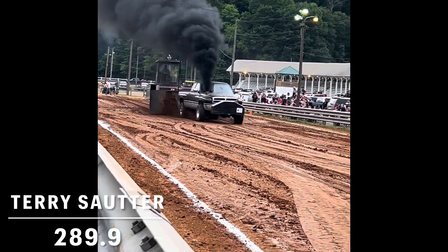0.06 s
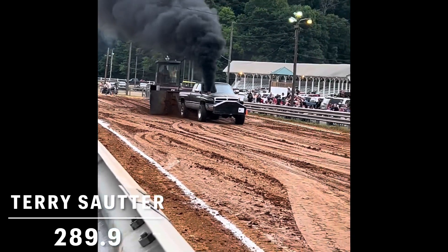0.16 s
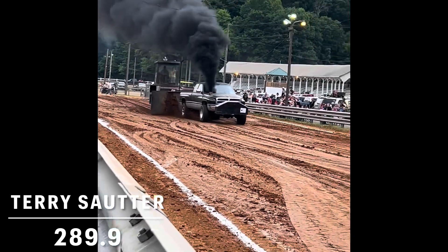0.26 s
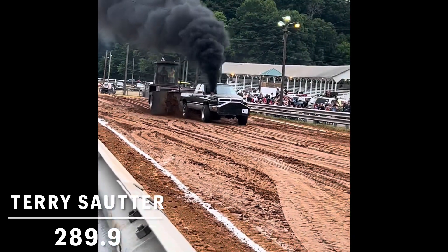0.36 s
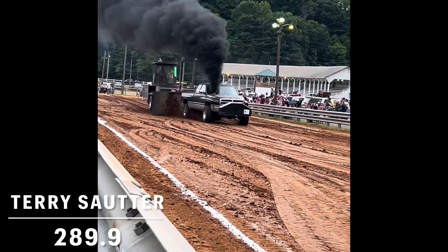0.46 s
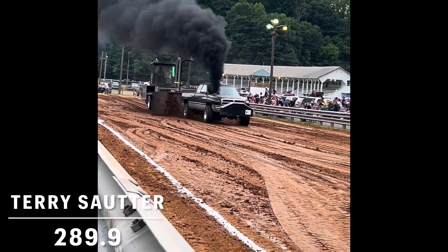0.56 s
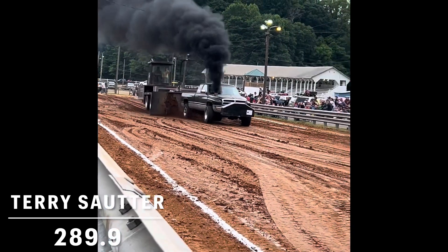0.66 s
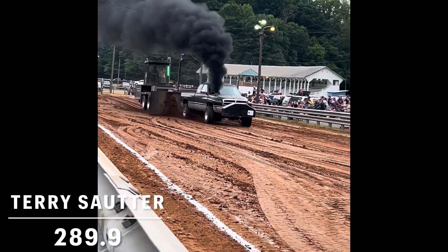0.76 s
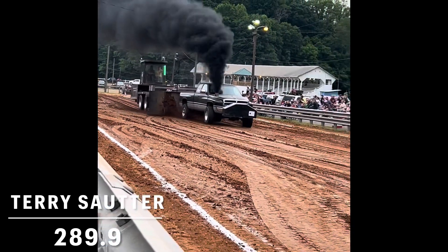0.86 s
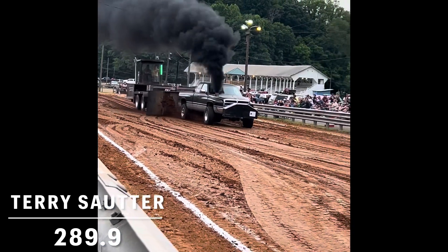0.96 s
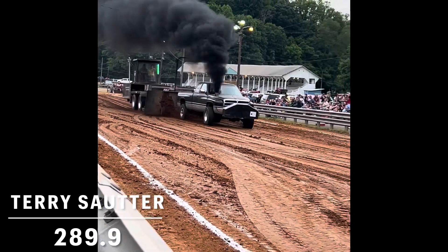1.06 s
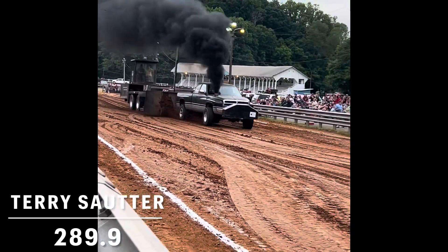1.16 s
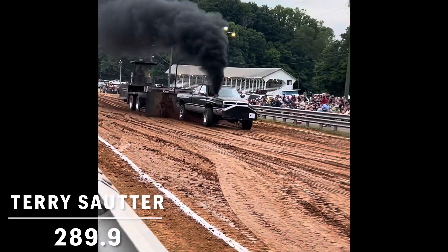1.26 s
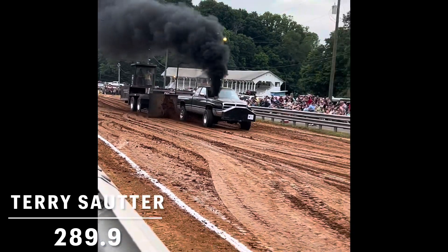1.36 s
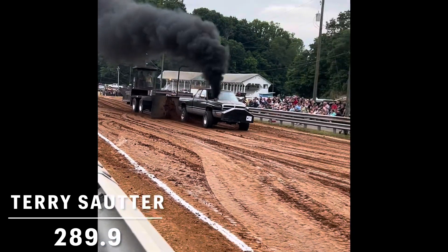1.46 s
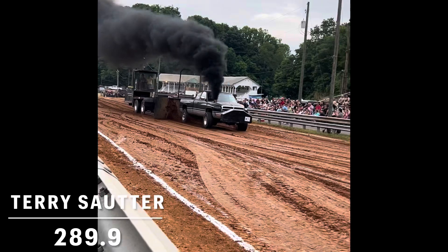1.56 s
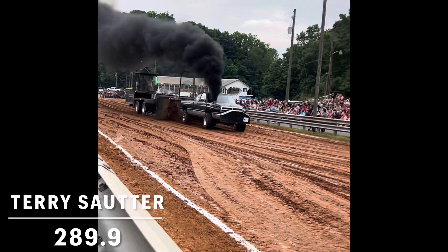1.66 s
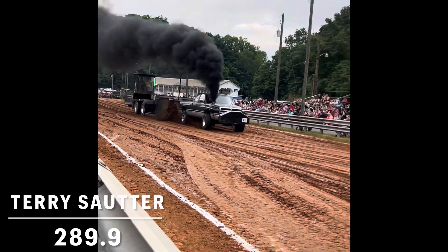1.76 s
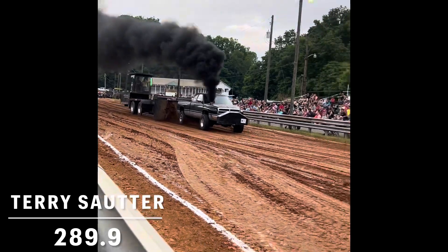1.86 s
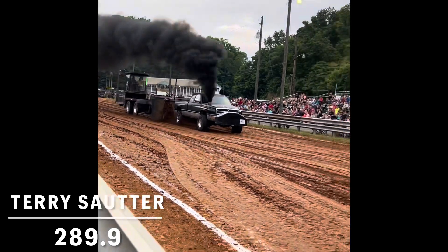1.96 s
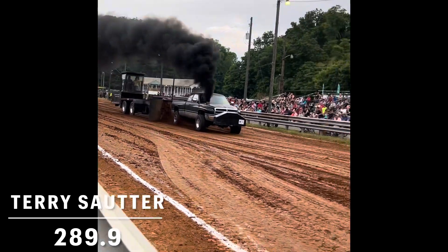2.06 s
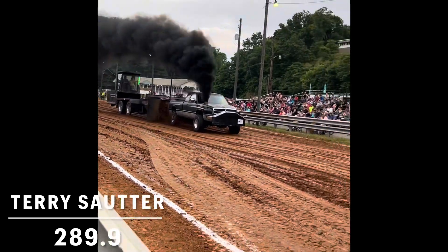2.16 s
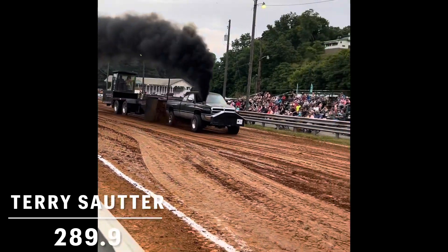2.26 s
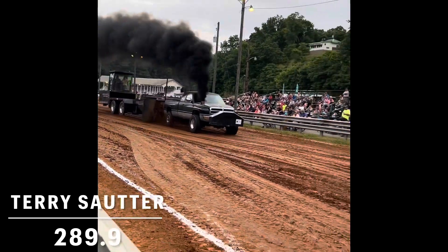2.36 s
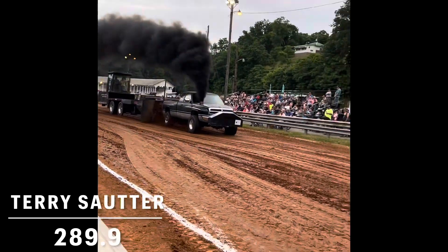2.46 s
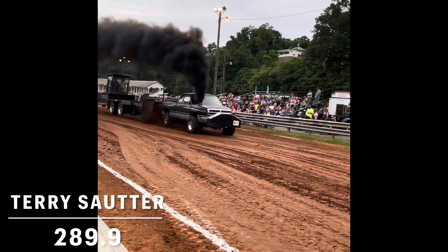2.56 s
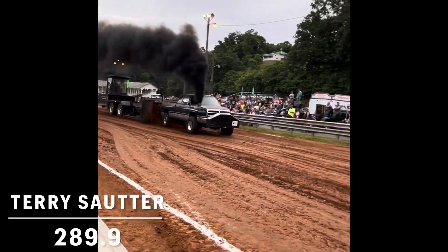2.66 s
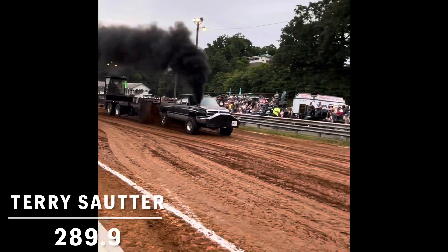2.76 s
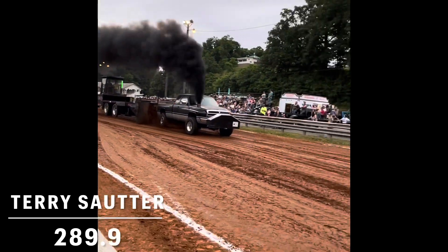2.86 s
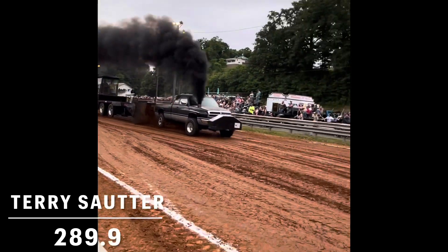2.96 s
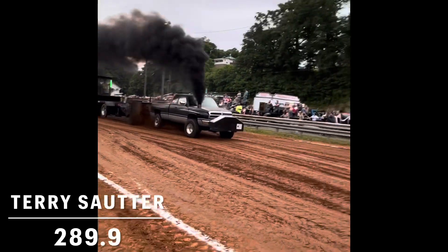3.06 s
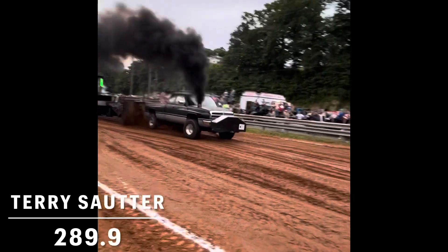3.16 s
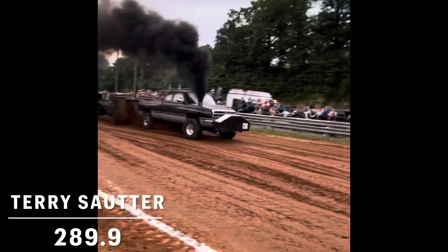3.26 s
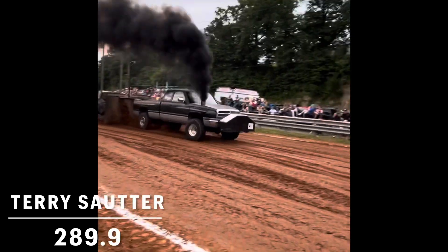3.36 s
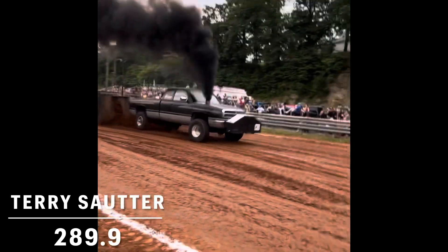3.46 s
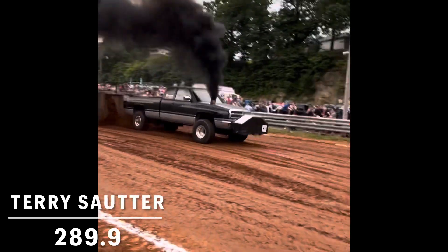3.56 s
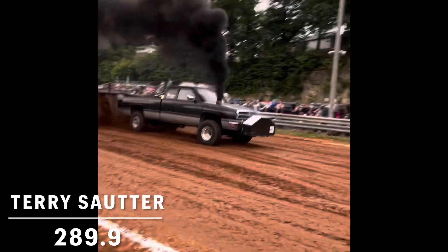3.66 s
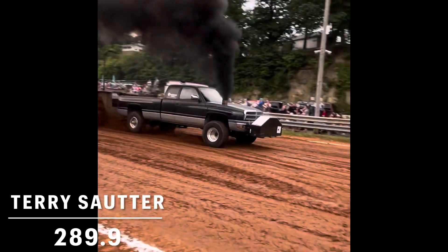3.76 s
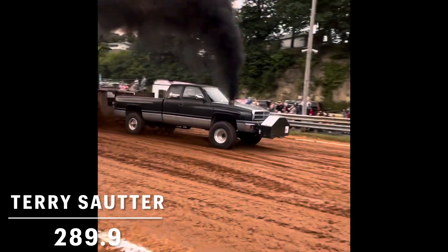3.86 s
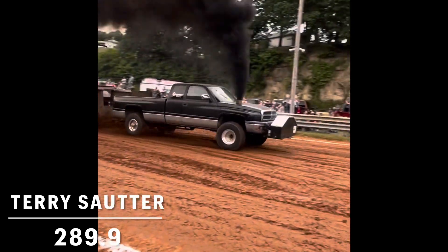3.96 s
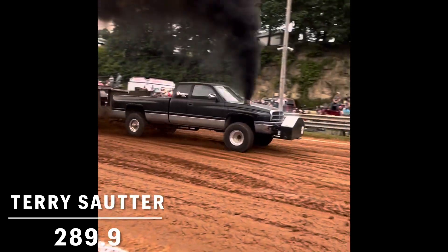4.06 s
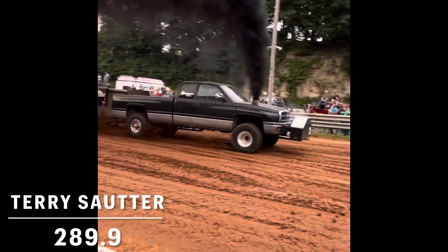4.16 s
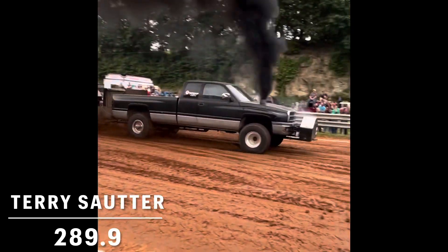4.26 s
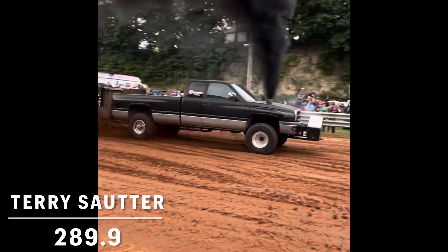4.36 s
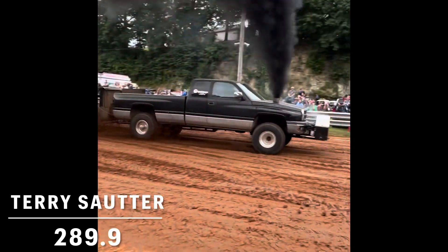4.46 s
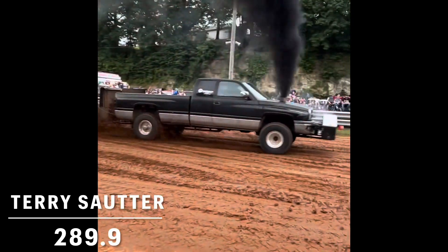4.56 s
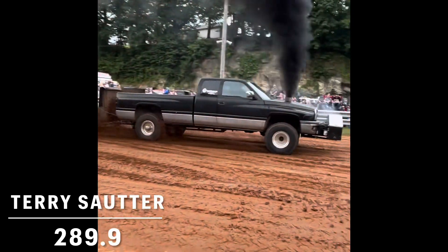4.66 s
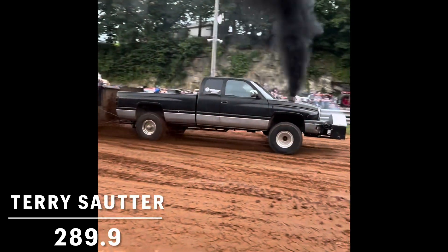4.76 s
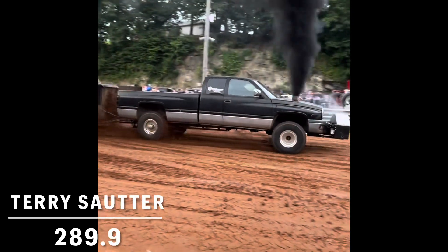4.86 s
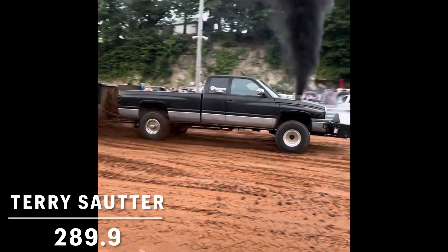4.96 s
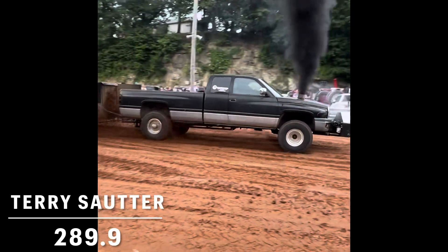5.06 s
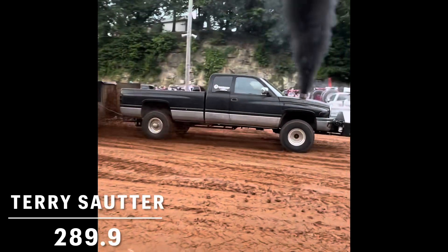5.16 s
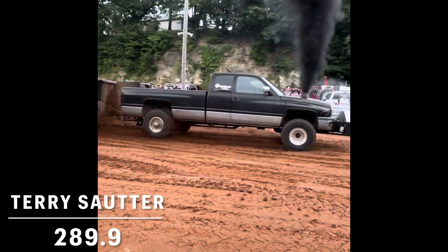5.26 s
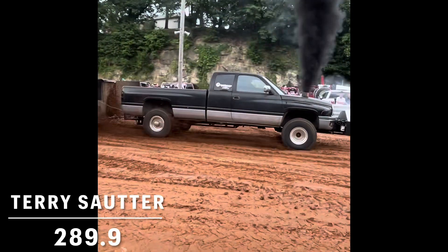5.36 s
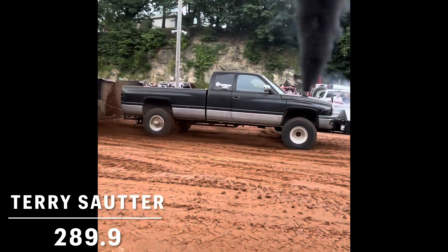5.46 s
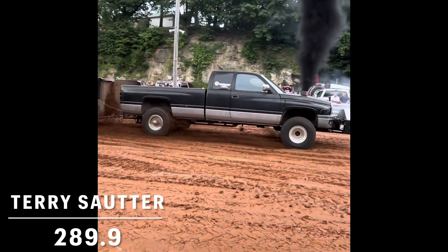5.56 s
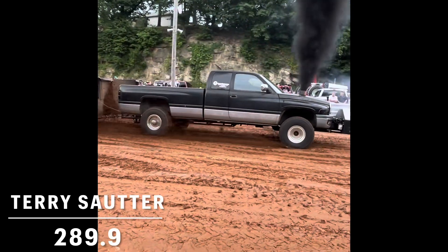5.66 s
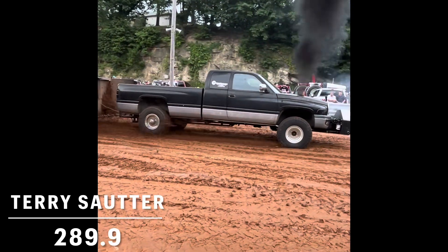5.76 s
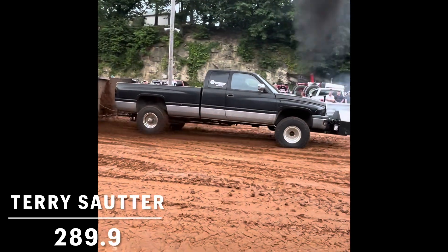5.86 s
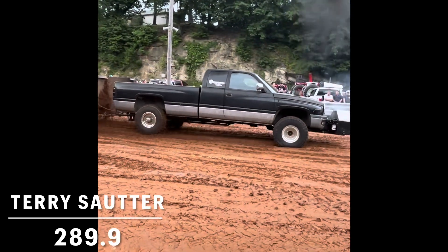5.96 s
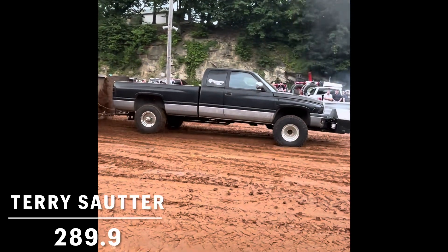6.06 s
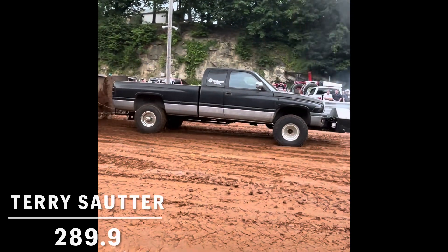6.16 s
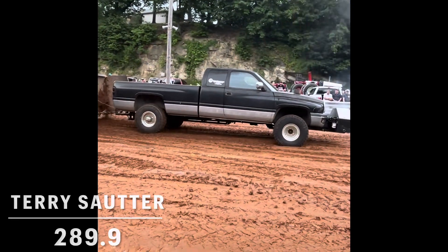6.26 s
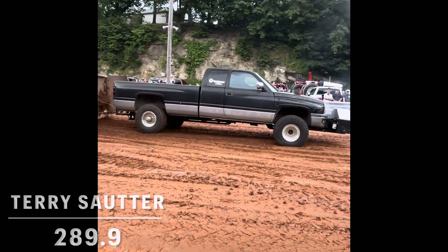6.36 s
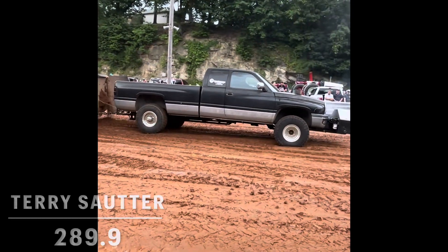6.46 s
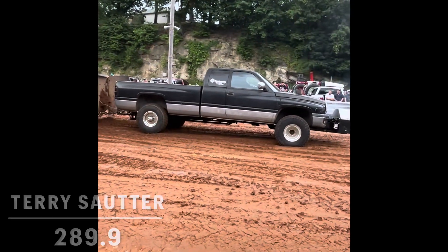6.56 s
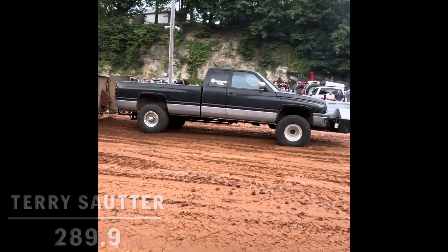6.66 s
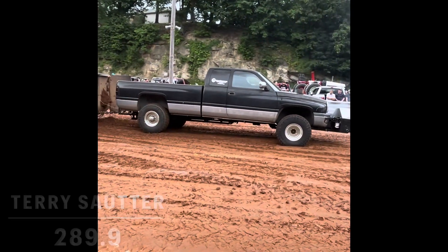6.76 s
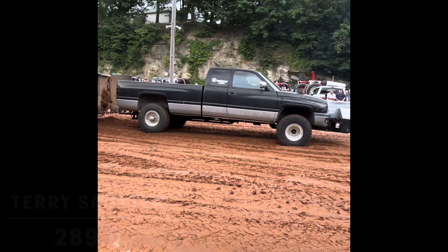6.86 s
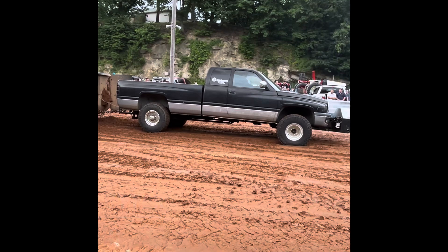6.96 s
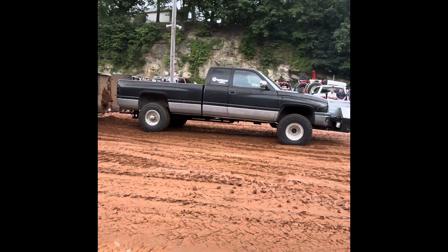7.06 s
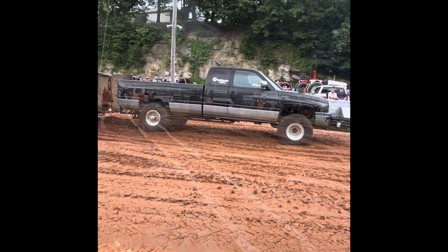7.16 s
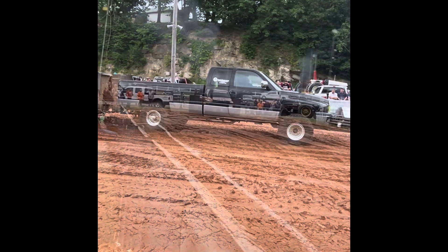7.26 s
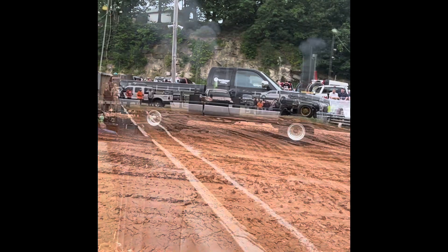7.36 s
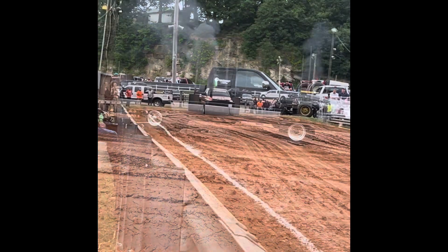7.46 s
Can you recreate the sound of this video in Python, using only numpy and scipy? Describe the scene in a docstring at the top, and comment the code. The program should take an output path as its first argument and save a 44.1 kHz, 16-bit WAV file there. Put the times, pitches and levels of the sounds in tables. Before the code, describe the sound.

A loud diesel pickup roars past at full throttle with popping exhaust, then lifts off with a clank as its turbo winds down.

```python
"""Diesel pull from the trackside

A turbocharged six-cylinder pickup drags a sled along a dirt track past a phone 8 m off, bogs down and
lifts off. The stack drones on crank orders and pops, gas roars once a firing, and the dirt mirrors the
roar. The turbos whistle and spool down, and the hitch clanks slack. Engines idle far off; at the end a
second truck, further up the track, fades in under load."""
import sys
import numpy as np
from scipy import signal
from scipy.fft import rfft, irfft, next_fast_len
from scipy.io import wavfile
from scipy.ndimage import uniform_filter1d

SR = 44100
rng = np.random.default_rng(int(sys.argv[2]) if len(sys.argv) > 2 else 0)


def pcm_store(signal):
    """Save signal as 16-bit PCM."""
    levels = np.round(np.clip(np.atleast_2d(signal), -1, 1) * 32767)
    wavfile.write(sys.argv[1], SR, levels.astype(np.int16).T)


N = 332073
TIME = np.arange(N) / SR
FFT_SIZE = next_fast_len(N)
BIN_HZ = np.arange(FFT_SIZE // 2 + 1) * SR / FFT_SIZE


def undb(db):
    """Gain of a level."""
    return 10 ** (np.asarray(db) / 20)


def curves(table):
    """Columns as sample curves, and a gate that is open while the table lasts."""
    s, *columns = np.transpose(table)
    gate = np.clip(np.minimum(TIME - s[0], s[-1] - TIME) / 0.033 + 1, 0, 1)
    return [np.interp(TIME, s, c) for c in columns] + [gate]


def equalise(x, spectrum):
    """Filter by rows of Hz and dB."""
    hz, db = np.transpose(spectrum)
    gain = undb(np.interp(np.log(BIN_HZ + 1), np.log(hz + 1), db))
    return irfft(rfft(x, FFT_SIZE) * gain, FFT_SIZE)[:N]


def noise(spectrum, swell=1):
    """Noise that follows a swell, coloured by a spectrum; rms 1."""
    coloured = equalise(rng.standard_normal(N) * swell, spectrum)
    return coloured / np.std(coloured)


def walk(rate):
    """Random levels held 1 / rate s and slewed twice; spread near 1."""
    hold = int(SR / rate)
    steps = np.repeat(rng.standard_normal(N // hold + 1), hold)
    return 1.303 * uniform_filter1d(uniform_filter1d(steps, hold), hold)[:N]


def tone(turns, db, waver_db, locked=False):
    """A sine wavering about an rms level; a locked one keeps the phase it is given."""
    peak = np.sqrt(2) * undb(db + waver_db * walk(14))
    return peak * np.sin(2 * np.pi * (turns + (0 if locked else rng.random())))


def blows(events, modes, push_s):
    """Each blow is a short ragged push that rings damped modes."""
    s, peak_db = np.transpose(list(events))
    t = np.arange(SR // 10) / SR
    pushes = (1 + 1.26 * rng.standard_normal((len(s), len(t)))) * np.exp(-t / push_s)
    ring = sum(undb(db - 60 * t / t60) * np.sin(2 * np.pi * hz * t) for hz, db, t60 in modes)
    rung = signal.fftconvolve(pushes, ring[None], axes=1)
    out = np.zeros(N + rung.shape[1])
    for at, gain, blow in zip((s * SR).astype(int), undb(peak_db), rung):
        out[at:at + len(blow)] += gain * blow / np.abs(blow).max()
    return out[:N]


def thin(x):
    """Cracks carry little bass and little top."""
    return signal.sosfilt(signal.butter(2, (300, 5500), "band", fs=SR, output="sos"), x)


# The pits, far from the microphone. Each row: frequency in Hz, relative level in dB.
PITS_COLOUR = [(24, -42), (40, -11.5), (124, 3), (307, -25), (621, -15), (2210, -27), (3100, -30),
               (4460, -29.5), (5990, -37.5), (9000, -49), (11700, -74), (19800, -120)]

def idling_engines():
    """Distant engines blur into a steady low noise."""
    return undb(-39) * noise(PITS_COLOUR)


# What the trackside throws back at the phone. Each row: frequency in Hz, gain in dB.
SCATTER_COLOUR = [(60, -44), (300, -15), (1000, -14), (3000, -8), (12000, -8)]

def trackside_scatter(x, t60_s=0.16):
    """Crowd, rails and bank return short tails, unrelated at the two ports, each wavering in strength."""
    t = np.arange(SR // 4) / SR
    tails = rng.standard_normal((6, 2, len(t))) * undb(-60 * t / t60_s)
    tails /= np.sqrt(4 * np.sum(tails ** 2, axis=2, keepdims=True))
    share = equalise(x, SCATTER_COLOUR)
    return sum(signal.oaconvolve((share * walk(25))[None], pair, axes=1)[:, :N] for pair in tails)


# Second truck, up the track: firing harmonics 1 to 4. Each row: level once in, in dB, climb in dB/s.
FAR_DRONE = [(-39, 37), (-45, 26), (-49, 13), (-67, 10)]
# Its rumble. Each row: time in seconds, pitch in Hz, level in dB.
FAR_RUMBLE = [(7.14, 94.1, -50), (7.17, 97, -31), (7.2, 97.5, -26), (7.24, 101.6, -24), (7.3, 101.7, -24.5),
              (7.34, 75, -34), (7.375, 75, -23), (7.445, 79, -39), (7.495, 80, -15.5), (7.53, 84.3, -34)]
# Its gas. Each row: time in seconds, then roar, rasp, hiss and whoosh in dB.
FAR_GAS = [(7.15, -46, -58, -66, -62), (7.22, -33, -49, -58, -51), (7.27, -37, -50, -59, -56),
           (7.31, -40.5, -54, -67, -54), (7.38, -34, -48, -61, -49), (7.46, -32.5, -45, -62, -44),
           (7.53, -33, -50, -63, -52)]
# Its turbo intake. Each row: frequency in Hz, relative level in dB.
WHOOSH_COLOUR = [(2800, -20), (3600, 4), (4400, 1), (5400, -19), (6500, -14), (7800, -4), (8600, -8),
                 (9600, -20), (10000, -60)]
# Its pops. Each row: start in seconds, level in dB.
FAR_POPS = [(7.188, -30), (7.219, -25), (7.265, -25), (7.374, -24), (7.418, -23), (7.507, -30)]

def far_truck(start_s=7.13, fade_s=0.046, firing_hz=217.3, climb_hz_per_s=32):
    """A diesel revs under load: drone, lumpy rumble, gas roar, intake whoosh and pops."""
    since = np.clip(TIME - start_s, 0, None)
    fade = np.clip(since / fade_s, 0, 1) ** 2
    firings = np.cumsum(firing_hz + climb_hz_per_s * since) / SR
    drone = sum(tone(k * firings, db + climb * (since - fade_s), 1.5)
                for k, (db, climb) in enumerate(FAR_DRONE, 1))
    low_hz, low_db, gate = curves(FAR_RUMBLE)
    turns = np.cumsum(low_hz * (1 + 0.05 * walk(30))) / SR
    rumble = tone(turns, low_db, 1.4) + tone(1.5 * turns, low_db - 13, 3) + tone(2 * turns, low_db - 15, 3)
    *gas_db, whoosh_db, _ = curves(FAR_GAS)
    air = exhaust_gas(firings, 1.5 * np.cos(np.pi * firings / 3), *gas_db)
    air += undb(whoosh_db) * noise(WHOOSH_COLOUR)
    return fade * (drone + air) + gate * rumble + thin(blows(FAR_POPS, STACK_MODES, push_s=0.0017))


# Turbo air, the near truck abreast of the phone. Each row: time in seconds, level in dB.
SIGH_LEVEL = [(4.4, -36), (5.6, -34), (5.78, -37.5), (6.1, -44), (6.5, -50.5), (7.2, -69)]
# Its colour. Each row: frequency in Hz, relative level in dB.
SIGH_COLOUR = [(1500, -5), (2400, 11.5), (3100, -4), (3600, 9.5), (4300, 18.5), (4800, 2), (5600, 2),
               (5900, -39)]

def turbo_sigh():
    """Air sighs through the slowing turbos."""
    db, gate = curves(SIGH_LEVEL)
    return gate * undb(db + walk(16)) * noise(SIGH_COLOUR)


# Turbo under load, coming down the track. Each row: time in seconds, pitch in Hz, level in dB.
BOOST = [(.3, 8620, -56), (.54, 8620, -47), (1.2, 8620, -48), (1.5, 8870, -44), (1.9, 8860, -37),
         (2.2, 8655, -41), (3, 8520, -41), (3.2, 8120, -44), (3.6, 8140, -41), (3.8, 7970, -43),
         (4.2, 8200, -45), (4.5, 7910, -48), (5.6, 7990, -56)]
# Running down, close by. Each row: time in seconds, pitch in Hz, level in dB, its octave in dB.
FAST_SPOOL = [(5.82, 6380, -48, -52), (5.85, 6230, -37, -40), (5.91, 5850, -45, -46),
              (5.96, 5550, -56, -62), (6.03, 5200, -42, -80), (6.19, 4480, -42, -80),
              (6.22, 4380, -53, -80), (6.3, 4150, -64, -80)]
# A slower turbo running down. Each row: time in seconds, pitch in Hz, level in dB.
SLOW_SPOOL = [(6.35, 9600, -74), (6.5, 8800, -63), (6.7, 7800, -65), (6.85, 7170, -66), (7.1, 6250, -70)]

def turbo_whistles():
    """Spinning blades whistle, and the pitch falls as they slow."""
    out = np.zeros(N)
    for table, pitch_waver in ((BOOST, .0045), (FAST_SPOOL, .003), (SLOW_SPOOL, .011)):
        hz, *levels, gate = curves(table)
        blades = np.cumsum(hz * (1 + pitch_waver * walk(150))) / SR
        out += gate * sum(tone(k * blades, db, 2.15) for k, db in enumerate(levels, 1))
    return out


# Clanks between truck and sled. Each row: start in seconds, level in dB.
CLANKS = [(5.9394, -12), (6.437, -35)]
# The hitch's ring. Each row: frequency in Hz, relative level in dB, t60 in seconds.
HITCH_MODES = [(1300, -14, 0.0077), (1780, -14, 0.0098), (2300, 1, 0.029), (2760, 2, 0.011),
               (3500, -9, .008), (4150, 2, .007), (4600, 3.5, 0.012), (5260, -17, .006)]

def hitch_clanks():
    """The hitch knocks and rings as it goes slack."""
    return thin(blows(CLANKS, HITCH_MODES, push_s=0.016))


# The truck near idle in front of the phone. Each row: start in seconds, peak level in dB.
CHUGS = [(6.789, -34), (6.839, -38), (6.888, -30), (6.952, -41), (7.022, -36), (7.09, -35)]
# The pipe's low note. One row: frequency in Hz, relative level in dB, t60 in seconds.
PIPE_MODE = [(118.1, 0, 0.071)]

def idle_chugs():
    """Lumpy firings thump the exhaust pipe."""
    return blows(CHUGS, PIPE_MODE, push_s=0.0018)


# The open stack going by the microphone. Each row: time in seconds, level in dB.
RUSH_LEVEL = [(0, -40), (2.2, -34), (2.8, -36), (3.3, -26.5), (3.9, -25), (4.4, -30), (5.7, -69),
              (7.2, -70)]
# Its colour. Each row: frequency in Hz, relative level in dB.
RUSH_COLOUR = [(1500, -17.5), (2300, -5.5), (3100, -1.5), (3700, -8.5), (5000, -18.5), (6000, -64)]

def stack_rush(firings):
    """A rush round 3 kHz pulses with the firings and swells as the stack passes."""
    db, _ = curves(RUSH_LEVEL)
    return undb(db + 0.52 * walk(12)) * noise(RUSH_COLOUR, 1 + 0.38 * np.cos(2 * np.pi * firings))


# Low, middle and top bands of either truck's gas. Each row: frequency in Hz, relative level in dB.
ROAR_COLOUR = [(40, -35), (70, -30), (140, -27), (200, -15), (280, -18.5), (420, -16.5), (650, -9.5),
               (880, -15.5), (1300, -24), (2000, -82)]
RASP_COLOUR = [(500, -10.5), (900, -5.5), (1600, -2), (2600, -9), (3600, -5), (4600, -4.5), (5650, -10),
               (5950, -72), (7500, -77)]
HISS_COLOUR = [(4000, -41), (5900, -43), (6300, -6), (6900, -0.5), (8500, -1.5), (9600, -0.5), (9900, -53),
               (10700, -49), (11000, -3), (13800, -4.5), (14300, -5), (15500, -50)]

def exhaust_gas(firings, bark_db, roar_db, rasp_db, hiss_db):
    """Gas leaves in puffs, one a firing, each of its own size; the barks swell it."""
    chance = rng.standard_normal(N // 100)
    size_db = bark_db + 1.07 * uniform_filter1d(chance[firings.astype(int)], size=60)
    puff = np.cos(2 * np.pi * firings)
    # puff size shows less in the treble, which comes from steady flow
    bands = ((ROAR_COLOUR, roar_db, 1.01, .3), (RASP_COLOUR, rasp_db, .8, .4),
             (HISS_COLOUR, hiss_db, .4, .3))
    return sum(undb(db + .7 * walk(8)) * noise(spectrum, undb(share * size_db) * (1 + depth * puff))
               for spectrum, db, share, depth in bands)


# The loudest pops, at close range. Each row: start in seconds, level in dB.
LOUD_POPS = [(3.08, -13), (3.127, -9), (3.163, -10), (3.197, -14), (3.233, -6), (3.304, -6.5), (3.363, -11),
             (3.4, -10), (3.435, -8), (3.475, -18), (3.509, -15), (3.603, -9), (3.671, -8), (3.779, -16),
             (3.809, -15), (3.849, -10), (3.915, -9), (3.981, -20), (4.049, -8), (4.121, -18), (4.151, -14),
             (4.207, -15), (4.282, -15), (4.354, -12), (4.425, -12), (4.497, -14), (4.566, -9),
             (4.634, -20), (4.706, -10), (4.74, -15), (4.812, -8), (4.884, -12), (4.957, -10), (4.995, -11),
             (5.067, -13), (5.139, -9), (5.208, -8), (5.273, -9), (5.307, -9), (5.37, -11), (5.439, -11),
             (5.544, -14), (5.612, -6)]
# The stack's ring. Each row: frequency in Hz, relative level in dB, t60 in seconds.
STACK_MODES = [(593, -7, 0.025), (790, 4, 0.013), (1050, 1.5, .009), (1619, 2, 0.012), (2210, 3, 0.014),
               (2750, -1, .005), (3370, -8, 0.0052)]

def stack_pops(firings, pop_db, bark_rise_s=0.0019, bark_decay_s=.008):
    """The lead cylinder cracks the stack once a cycle; gas barks behind it, then the exhaust falters."""
    at = np.flatnonzero(np.diff((firings / 6 + 0.121).astype(int)))
    jitter, spread = rng.standard_normal((len(at), 2)).T
    size_db = pop_db[at] + 2.5 * spread
    at = np.clip(at + (25 * jitter).astype(int) - 60, 0, N - 1)
    for s, db in LOUD_POPS:  # each stands in for the nearest ordinary pop
        nearest = np.argmin(np.abs(at - s * SR))
        at[nearest], size_db[nearest] = s * SR, db
    kicks, barks = np.zeros((2, N))
    kicks[at] = undb(size_db)
    barks[at] = 1.5 + .09 * (size_db - pop_db[at])
    t = np.arange(SR // 25) / SR
    falter = signal.fftconvolve(kicks, np.exp(-.5 * ((t - .016) / .006) ** 2))[:N]  # deepest 16 ms on
    bark = signal.fftconvolve(barks, np.exp(-t / bark_decay_s) * np.clip(t / bark_rise_s, 0, 1))[:N]
    cracks = thin(blows(zip(at / SR, size_db), STACK_MODES, push_s=0.0006))
    return cracks, bark, undb(-8 * falter)


def off_dirt(x, speed_m_s=8.6, stop_s=4.45, side_m=8, stack_height_m=1.8, phone_height_m=1.31):
    """Direct sound plus its mirror off the track; the comb slides down as the truck nears."""
    range_m = np.hypot(side_m, speed_m_s * np.clip(stop_s - TIME, 0, None))
    late_s = 2 * stack_height_m * phone_height_m / range_m / 343
    share = .37 - .01 * (side_m / range_m) ** 6
    dull = signal.filtfilt(*signal.butter(1, 6000, fs=SR), x)  # clods scatter the treble
    wobble = 1 + .025 * walk(10)  # the stack shakes as the truck hops
    return x + share * np.interp(TIME - late_s * wobble, TIME, dull)


# Turning points of the revs down the track. Each row: time in seconds, crank speed in Hz.
SURGES = [(0, 63.6), (0.219, 58.82), (.46, 63.35), (.68, 59.03), (0.861, 63.96), (1.1, 61.55),
          (1.461, 66.9), (1.64, 65.83), (1.82, 69.64), (2.15, 63.77), (2.3, 65.05), (2.51, 65.5),
          (2.75, 63.1), (2.941, 66.93), (3.151, 56.36), (3.35, 60.4), (3.47, 58.17), (3.55, 60.45),
          (3.731, 54.42), (3.89, 59.63), (4.151, 62.6), (4.35, 54.62), (4.59, 57.3), (5.05, 54.75),
          (5.25, 61.42), (5.47, 57.03), (5.7, 67.1)]

def crank(lift_s=5.72, ease_s=0.011, idle_hz=15, coast_s=1.1):
    """The crank surges about its mean as the tyres bite and slip, then sinks when the throttle shuts."""
    s, hz = np.transpose(SURGES)
    rows = np.arange(len(s))
    place = np.interp(TIME, s, rows)
    eased = np.floor(place) + (1 - np.cos(np.pi * (place % 1))) / 2
    loaded_hz = np.interp(eased, rows, hz)
    coast = np.exp(-np.clip(TIME - lift_s, 0, None) / coast_s)
    throttle = np.interp(TIME, (lift_s - ease_s, lift_s + ease_s), (1, 0))
    surge_hz = (loaded_hz - uniform_filter1d(loaded_hz, size=SR // 2)) * throttle
    return idle_hz + (loaded_hz - idle_hz) * coast, surge_hz, throttle


# Uneven cylinders. Each row: crank order, dB against the firing tone from afar, the same alongside.
UNEVEN_ORDERS = [(1.5, -27, -19.5), (2, -22.5, -36), (2.5, -30.5, -20), (2.75, -24, -23.5),
                 (3.25, -27.5, -23), (3.5, -28, -18), (4, -20, -19), (4.5, -30, -29.5), (5, -17, -29),
                 (5.5, -29.5, -30), (5.75, -29, -29.5), (7, -29.5, -28), (8, -31.5, -31), (9, -55, -25.5)]
# Overtones that clear with the throttle shut. Each row: crank order, dB against the firing tone.
COAST_ORDERS = [(8, -28.5), (10, -19), (12, -21.5)]

def stack_drone(turns, surge_hz, throttle, near, firing_db, octave_db, crank_db):
    """Three firings a turn sound the stack; the firing tone swells as revs sag, order 1 as they rise."""
    drone = tone(3 * turns, firing_db - 0.37 * surge_hz, .8, locked=True)
    drone += tone(6 * turns, octave_db, 1.76, locked=True)
    drone += tone(turns, crank_db + 0.6 * surge_hz, 1.3)
    steady_db = uniform_filter1d(firing_db, size=12000)
    drone += sum(tone(k * turns, steady_db + far + near * (alongside - far), 1.85)
                 for k, far, alongside in UNEVEN_ORDERS)
    return drone + (1 - throttle) * sum(tone(k * turns, steady_db + db, 3.2) for k, db in COAST_ORDERS)


# The exhaust from the trackside, under load and then with the throttle shut.
# Each row: time in seconds, then firing tone, its octave, roar, rasp and hiss in dB.
LOAD_LEVELS = [(0, -14, -29, -27, -28, -38), (.15, -12, -23, -28.5, -28, -39),
               (.35, -13, -23.5, -27.5, -28.5, -40), (.51, -15, -22.5, -29.5, -29.5, -40),
               (.66, -9, -26, -27.5, -28.5, -40), (.75, -13.5, -21.5, -26, -27.5, -39.5),
               (.88, -15, -25.5, -27.5, -28.5, -39.5), (1.1, -14, -23, -25, -29.5, -38.5),
               (1.32, -15, -21, -27, -28, -39), (1.4, -10, -23.5, -25, -28.5, -38),
               (1.5, -14, -22, -25.5, -29.5, -38), (1.66, -16.5, -18.5, -26.5, -29, -37),
               (1.75, -9, -26, -24, -28.5, -38), (1.83, -13, -22.5, -28, -29.5, -36.5),
               (1.95, -10, -24, -23.5, -28, -36), (2.08, -13, -23.5, -26.5, -28, -38),
               (2.25, -12, -24.5, -25.5, -27, -35), (2.32, -19, -23, -25.5, -29, -35),
               (2.55, -11.5, -27.5, -26.5, -26.5, -35.5), (2.9, -13, -36, -28, -25, -33.5),
               (3.1, -12.5, -27.5, -25.5, -26, -34), (3.3, -12, -22.5, -23.5, -24, -32.5),
               (3.5, -14.5, -28, -21.5, -24.5, -32.5), (3.65, -9.5, -21.5, -23, -23.5, -32.5),
               (3.75, -12.5, -22, -20.5, -23.5, -34.5), (3.85, -10.5, -23.5, -22, -22, -32),
               (4, -12, -35, -20, -23, -33), (4.2, -15, -30.5, -23, -27, -36),
               (4.4, -15, -28.5, -22, -26.5, -36.5), (4.55, -16.5, -32.5, -22.5, -27.5, -36),
               (4.65, -14.5, -33, -21, -25.5, -35), (4.85, -15, -30.5, -20.5, -26, -35.5),
               (5, -12.5, -21, -19.5, -26, -35), (5.12, -15, -26, -20.5, -25, -34.5),
               (5.18, -17, -52, -20.5, -24.5, -33.5), (5.28, -19.5, -31, -20.5, -26.5, -34.5),
               (5.4, -17.5, -32, -21, -28, -37), (5.58, -18, -46, -23.5, -26, -36),
               (5.7, -22.5, -34.5, -22.5, -26.5, -36.5)]
COAST_LEVELS = [(5.75, -32, -49, -32.5, -40, -38), (6.001, -28.5, -50, -35.5, -41, -44),
                (6.15, -30, -57, -39.5, -44, -49), (6.35, -30.5, -67, -39.5, -45, -56),
                (6.62, -40, -70, -42.5, -50.5, -61.5), (7.2, -62, -64, -49, -68, -75)]

def pulling_truck():
    """One crank drives drone, gas and pops as the truck nears and lifts off; turbos and hitch join in."""
    near = np.interp(TIME, (2.6, 3.005), (0, 1))
    hz, surge_hz, throttle = crank()
    turns = np.cumsum(hz) / SR
    firings = 3 * turns

    def staged(far, alongside, coasting):
        return coasting + throttle * (far + near * (alongside - far) - coasting)

    firing_db, octave_db, *gas_db, gate = curves(LOAD_LEVELS + COAST_LEVELS)
    drone = stack_drone(turns, surge_hz, throttle, near, firing_db, octave_db, staged(-42, -30, -62))
    rush = stack_rush(firings)
    cracks, bark, choke = stack_pops(firings, pop_db=staged(-26, -17.5, -43))
    gas = exhaust_gas(firings, bark * staged(2, 5.5, 0), *gas_db)
    exhaust = gate * (choke * drone + off_dirt(choke * (gas + rush) + cracks))
    return exhaust + turbo_sigh() + idle_chugs() + hitch_clanks() + turbo_whistles()


# The phone's left microphone port against its right, with the truck far, passing and near.
# Each row: frequency in Hz, phase lead in radians, level difference in dB.
PORTS_FAR = [(60, -.05, 0), (200, -.2, 1), (400, -.5, 0), (850, -.6, 0), (1950, .4, 0), (2600, 2.2, 0),
             (3000, 1.8, -1), (3700, 1, -1), (5200, 1.8, 0), (6000, 3.1, 0), (7100, 4.9, 0), (8200, 6.3, 0),
             (9300, 8.3, 0), (13800, 14.9, 0)]
PORTS_PASS = [(60, -.05, 0), (200, -.2, 1), (550, -.7, -1), (1300, -.3, -1), (1950, .1, 0), (2250, .3, 3),
              (2600, -1, -3), (3000, -2.2, -5), (3500, -2.5, -6), (4000, -4.6, -5), (5200, -4.1, -4),
              (6000, -3.1, 0), (8200, 0, 0), (13800, 8.2, 0)]
PORTS_NEAR = [(60, -.05, 0), (200, -.2, 1), (550, -1, -8), (1100, -.8, -8), (1300, .7, -5), (1600, -.3, -1),
              (1950, .3, -2), (2600, -1.7, -2), (4000, -4.2, -1), (5200, -4, -3), (6000, -3.2, 0),
              (7100, -.6, 0), (8200, 0, 1), (13800, 8.6, 0)]

def left_port(x, table):
    """The wave at the left port, shifted and shaded by the phone's body."""
    hz, lead, db = np.transpose(table)
    response = undb(np.interp(BIN_HZ, hz, db)) * np.exp(1j * np.interp(BIN_HZ, hz, lead))
    return irfft(rfft(x, FFT_SIZE) * response, FFT_SIZE)[:N]


def scene():
    """Both trucks at the ports of a phone that turns after the first one."""
    first = pulling_truck() + idling_engines()
    second = far_truck()
    far = np.interp(TIME, (2.502, 3.2), (1, 0))
    near = np.interp(TIME, (3.6, 3.8), (0, 1))
    left = (left_port(first * far + second, PORTS_FAR) + left_port(first * (1 - far - near), PORTS_PASS)
            + left_port(first * near, PORTS_NEAR))
    right = first + second
    return np.array([left, right]) + trackside_scatter(right)


def record(dry):
    """The phone rounds the peaks, drops the deepest bass and cuts the top."""
    rounded = np.tanh(.9 * dry) / .9
    trimmed = signal.sosfilt(signal.butter(3, 40, "high", fs=SR, output="sos"), rounded)
    return signal.sosfilt(signal.ellip(8, .2, 70, 15700, fs=SR, output="sos"), trimmed)


dry = scene()
out = record(dry)
pcm_store(out)
```